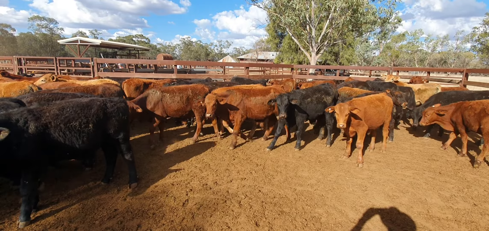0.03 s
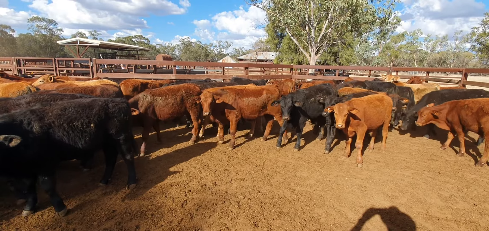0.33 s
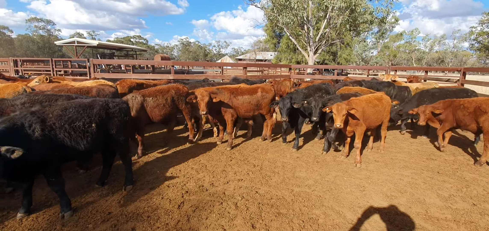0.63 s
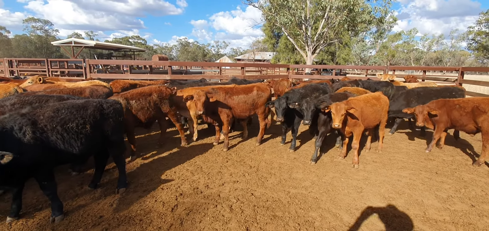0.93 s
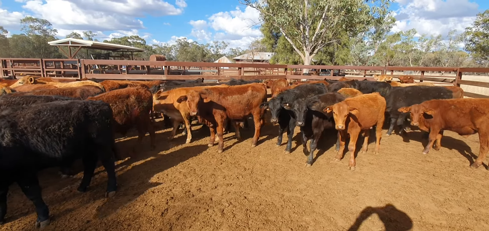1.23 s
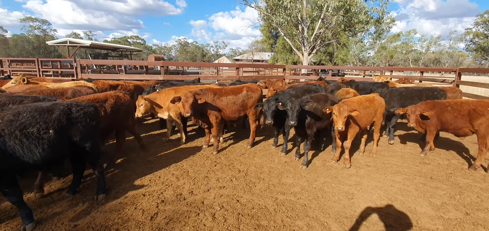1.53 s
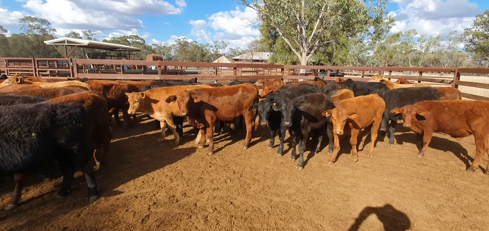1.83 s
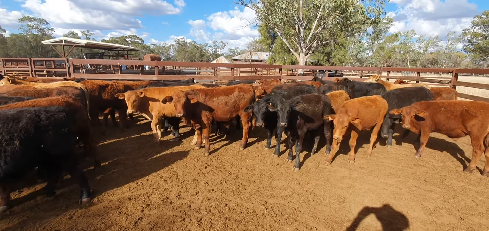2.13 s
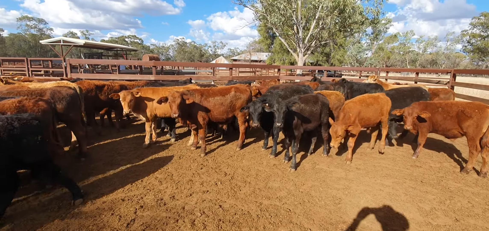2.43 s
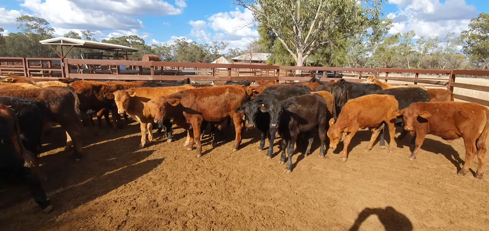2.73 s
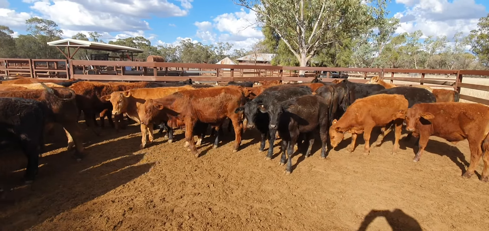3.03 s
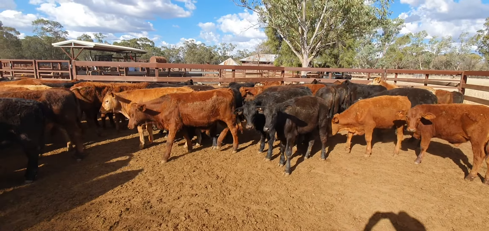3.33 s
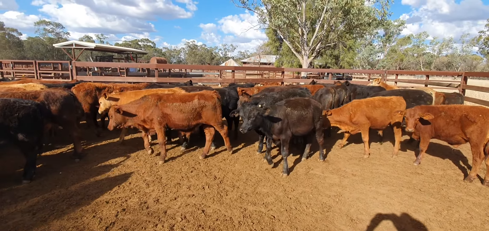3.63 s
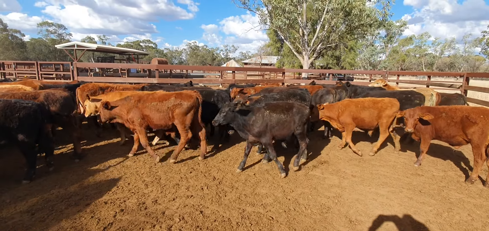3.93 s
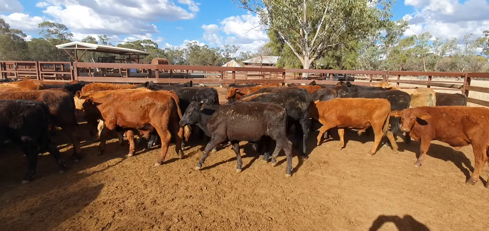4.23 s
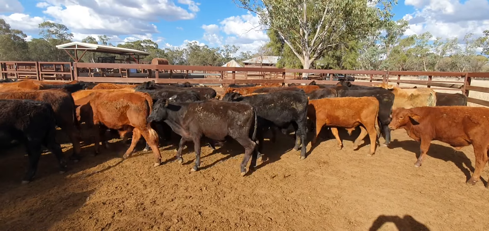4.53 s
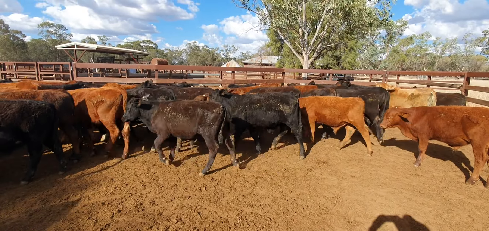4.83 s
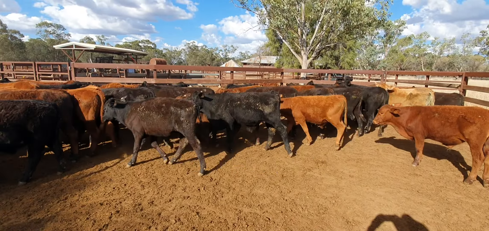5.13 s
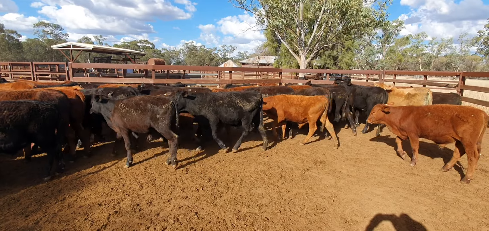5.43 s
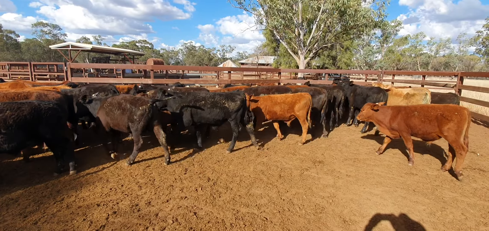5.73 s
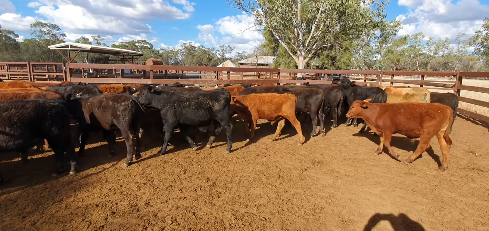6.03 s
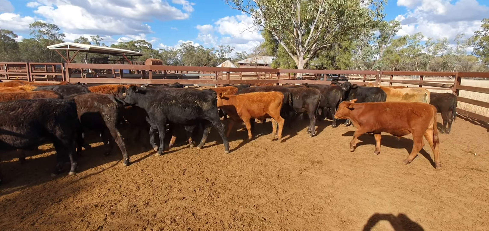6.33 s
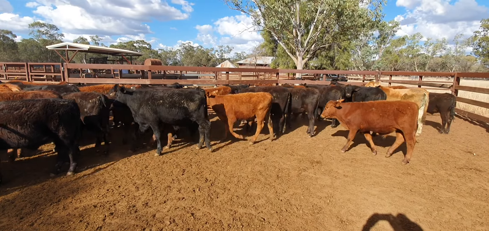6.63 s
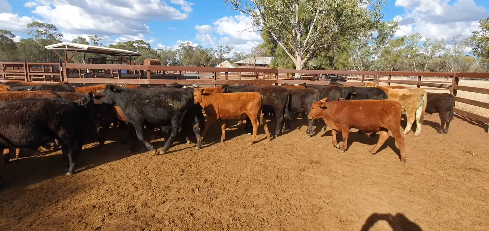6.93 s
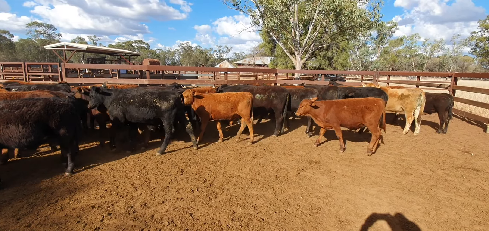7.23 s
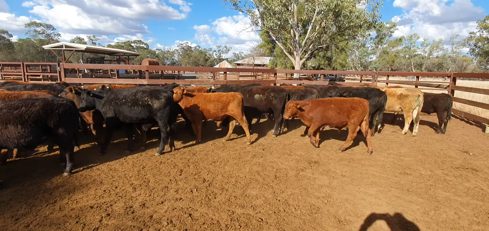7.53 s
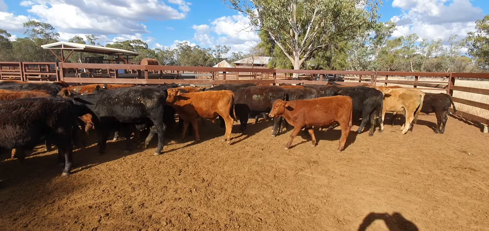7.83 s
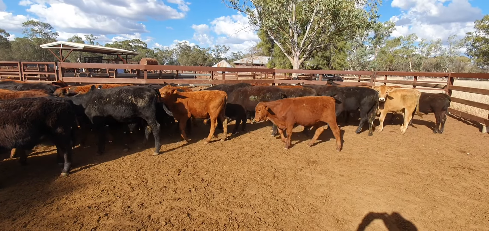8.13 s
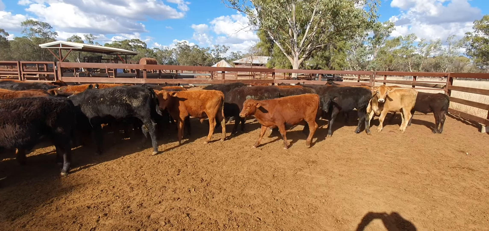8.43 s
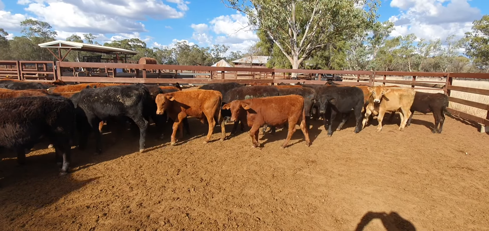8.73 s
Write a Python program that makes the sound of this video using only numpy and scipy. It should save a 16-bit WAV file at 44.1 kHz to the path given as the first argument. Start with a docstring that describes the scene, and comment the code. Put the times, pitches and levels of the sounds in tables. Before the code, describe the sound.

A herd shuffles quietly over dry ground in an open yard, with scattered dull hoof thuds, gritty scrapes and a light low rumble of air. The steps grow busier, then a gust of wind hits the microphone with deep, uneven thumps that dominate the hooves. A short metal clink and faint distant creaks and calls sit underneath. The gust falls away quickly and the soft footfalls carry on.

```python
"""An open stockyard, where young cattle mill about on dry dirt. Their crowded footfalls make a bed of
trample, rustle and dust, with faint creaks and calls far off. Nearer hooves thud on packed earth, crunch
its crust, scuff, flick pebbles and clack on stone; once a steel rail clinks. Over it all a gust builds,
rumbles and slaps at the two ports of the microphone, louder than the herd, and drops."""
import sys
import numpy as np
from scipy import signal
from scipy.fft import rfft, irfft, next_fast_len
from scipy.io import wavfile
from scipy.ndimage import uniform_filter1d

SR = 44100
rng = np.random.default_rng(int(sys.argv[2]) if len(sys.argv) > 2 else 0)


def output_pcm(signal):
    """Save a mono or channel-first signal as 16-bit PCM at the path in sys.argv[1].

    Samples are clipped to [-1, 1] before scaling.
    """
    pcm = np.clip(np.atleast_2d(signal).T, -1, 1) * 32767
    wavfile.write(sys.argv[1], SR, np.round(pcm).astype(np.int16))


N = 396459
TIME = np.arange(N) / SR


def amp(db):
    """Decibels to gain."""
    return 10 ** (np.asarray(db) / 20)


def unit(x):
    """Scales a sound to rms 1."""
    return x / np.sqrt(np.mean(x ** 2) + 1e-30)


def read(points, hz):
    """Reads a table of (f/Hz, value) on a log-frequency axis."""
    f, value = np.transpose(points)
    return np.interp(np.log(hz + 1), np.log(f + 1), value)


def curve(rows, column):
    """One column of a timed table as an automation curve, at every sample."""
    rows = np.asarray(rows)
    return np.interp(TIME, rows[:, 0], rows[:, column])


def add(mix, s, sound):
    """Mixes a stereo sound in at time s."""
    part = mix[:, max(0, round(s * SR)):][:, :sound.shape[1]]
    part += sound[:, :part.shape[1]]


def shaped(x, gain):
    """Filters a sound by a gain given as a function of Hz."""
    size = next_fast_len(x.shape[-1], True)
    return irfft(rfft(x, size) * gain(np.fft.rfftfreq(size, 1 / SR)), size)[..., :x.shape[-1]]


def eq(x, colour):
    """Equalises a sound by a table of (f/Hz, gain/dB)."""
    return shaped(x, lambda hz: amp(read(colour, hz)))


def bell_band(x, centre_hz, octaves):
    """Bell-shaped band-pass, returned at rms 1."""
    return unit(shaped(x, lambda hz: np.exp(-.5 * (np.log2((hz + 1) / centre_hz) / octaves) ** 2)))


def causal(x, gain):
    """Minimum-phase filter for hits: no sound comes before the attack."""
    size = 8192
    log_gain = np.log(gain(abs(np.fft.fftfreq(size, 1 / SR))) + 1e-9)
    response = np.exp(np.conj(signal.hilbert(log_gain)))[:size // 2 + 1]
    return irfft(rfft(x, size) * response, size)[..., :x.shape[-1]]


# stereo image of the yard: f/Hz, left-right correlation
PORT_LIKENESS = [(60, 1), (300, 0.75), (640, 0.55), (1400, -0.32), (3100, 0.18), (7000, -0.068)]
def paired(x):
    """Two unrelated sounds become a port pair: alike in the bass, wide in the treble."""
    alike = lambda hz: np.clip(read(PORT_LIKENESS, hz), -1, 1)
    right = shaped(x[0], alike) + shaped(x[1], lambda hz: np.sqrt(1 - alike(hz) ** 2))
    return np.array([x[0], right])


def drift(rate_hz):
    """Slow random modulation of rms 1, up to about the given rate."""
    return unit(shaped(rng.standard_normal(N), lambda hz: 1 / (1 + (hz / rate_hz) ** 4)))


def grains(size, per_s, spread_db):
    """Crumbs of dirt breaking: sparse stereo clicks of uneven size."""
    sizes = amp(spread_db * np.minimum(rng.exponential(1, size), 4))
    breaks = rng.random(size) < per_s / SR
    return sizes * breaks * rng.standard_normal((2, size))


# faint far creaks and calls: t/s, length/s, level/dB, f/Hz, width/Hz
CALL_CUES = [(4.139, 0.19, -61.5, 1270, 150), (6.521, 0.085, -57, 1220, 220),
             (8.132, 0.086, -74, 2590, 220), (8.367, 0.25, -64, 612, 140), (8.708, 0.092, -62, 2670, 420),
             (8.854, 0.077, -62, 2680, 420)]
def far_calls():
    """Distance blurs each call to a narrow, soft-edged band of noise."""
    out = np.zeros((2, N))
    for s, length_s, db, call_hz, width_hz in CALL_CUES:
        noise = paired(rng.standard_normal((2, int(length_s * SR))))
        tone = unit(shaped(noise, lambda hz: 1 / (1 + (2 * (hz - call_hz) / width_hz) ** 4)))
        add(out, s, amp(db) * tone * signal.windows.tukey(tone.shape[1], .5))
    return out


# hiss of the finest sand, raised by the nearest hooves: t/s, level/dB
SAND_RIDE = [(0, -82), (0.25, -85), (0.55, -82), (1.15, -90), (1.8, -92), (2.4, -81), (2.62, -75),
             (2.92, -73), (3.05, -83), (3.6, -83), (3.9, -77), (4.6, -78), (5.3, -77), (6.1, -77),
             (6.7, -78), (7.05, -75), (7.4, -83), (8.15, -92), (8.99, -85)]
# its airy colour: f/Hz, gain/dB
SAND_EQ = [(9000, -35), (11500, -4), (13500, -2), (15500, -2)]
def sand(trim_db=-1, sway_db=2.0):
    """Fine sand slides off the hooves in a soft, grainy swish."""
    slide = paired(rng.standard_normal((2, N)) + 0.4 * unit(grains(N, per_s=1500, spread_db=-3.0)))
    level_db = curve(SAND_RIDE, column=1) + trim_db + sway_db * drift(rate_hz=8.0)
    return amp(level_db) * unit(eq(slide, SAND_EQ))


def footfalls(per_s, fade_s):
    """Pressure of many unseen hooves: each lands at once and eases off."""
    lands = (rng.random(N) < per_s / SR) * rng.uniform(0.27, 1, N)
    return unit(signal.lfilter([1], [1, -np.exp(-1 / (fade_s * SR))], lands))


def patchy(x, depth_db=1.8):
    """Each shuffling hoof has its own colour: brief patches of the spectrum swell and sink."""
    spectra = signal.stft(x, nperseg=1024)[2]
    across_pitch = uniform_filter1d(rng.standard_normal(spectra.shape[1:]), size=4, axis=0)
    patches = unit(uniform_filter1d(across_pitch, size=11, axis=1))
    return signal.istft(spectra * amp(depth_db * patches), nperseg=1024)[1][:, :N]


def shuffle(colour, level_db, steps, step_share, crumb_share):
    """A wash of far shuffling with nearer crumbs crushed under each footfall."""
    wash = rng.standard_normal((2, N)) + crumb_share * unit(grains(N, per_s=900, spread_db=4.0))
    pressed = wash * np.sqrt(1 + (step_share * steps) ** 2)
    return amp(level_db) * unit(eq(patchy(paired(pressed)), colour))


# how busily the herd moves: t/s, rustle floor/dB, fizz floor/dB, trample floor/dB
HERD_RIDE = [(0.0, -63, -75.5, -67), (0.47, -63, -75, -63), (0.6, -64, -80, -66), (1.15, -63.5, -78.5, -68),
             (1.33, -60.5, -78, -61), (1.85, -64, -81, -65.5), (2.63, -62, -72, -62.5),
             (3.6, -63.5, -79.5, -66), (3.93, -59.5, -74, -56.5), (4.08, -61.5, -76, -63),
             (4.58, -62.5, -73.5, -59.5), (5.26, -61.5, -76.5, -62), (6.76, -60, -73.5, -55),
             (7.13, -62, -70, -62), (7.34, -65, -77, -65.5), (7.63, -66.5, -78, -68.5),
             (8.34, -67.5, -83, -69), (8.99, -61.5, -79, -60)]
# low body of the trample: f/Hz, gain/dB
TRAMPLE_EQ = [(60, -18), (130, 5), (250, 4.5), (400, -2), (700, -0.5), (950, -7), (1500, -14), (3000, -48)]
# dry midrange rustle of dirt: f/Hz, gain/dB
RUSTLE_EQ = [(600, -74), (1000, -4.5), (1350, 2), (1700, 1.5), (2150, 2.5), (2750, -3.5), (3600, 1),
             (4500, -1.5), (6000, -3.5), (7500, -11.5), (11000, -21.5)]
# top-end fizz of fine dust: f/Hz, gain/dB
FIZZ_EQ = [(4000, -24), (7000, 1.5), (9000, 2.5), (11300, 4), (13500, -12), (15500, -12)]
RUSTLE_LIFT_DB, FIZZ_LIFT_DB, TRAMPLE_LIFT_DB = 2.5, 0.5, 1.5  # each rides above its floor
def herd(trample_sway_db=1.83, rustle_sway_db=0.5, fizz_sway_db=1.1, sway_hz=6.8):
    """Trample, rustle and dust follow the same soft, crowded footfalls; each sways with the strides."""
    steps = footfalls(per_s=45, fade_s=.01)
    trample_db = curve(HERD_RIDE, column=3) + TRAMPLE_LIFT_DB + trample_sway_db * drift(sway_hz)
    rustle_db = curve(HERD_RIDE, column=1) + RUSTLE_LIFT_DB + rustle_sway_db * drift(sway_hz)
    fizz_db = curve(HERD_RIDE, column=2) + FIZZ_LIFT_DB + fizz_sway_db * drift(sway_hz)
    trample = shuffle(TRAMPLE_EQ, trample_db, steps, step_share=0.1, crumb_share=0.24)
    rustle = shuffle(RUSTLE_EQ, rustle_db, steps, step_share=0.36, crumb_share=0.17)
    fizz = shuffle(FIZZ_EQ, fizz_db, steps, step_share=0.1, crumb_share=0.36)
    return trample + rustle + fizz


def far_thuds(count=60, over_trample_db=6, spread_db=1.0, lowest_hz=110):
    """Dull thumps of hooves deep in the herd, each a cycle or two of ground ringing."""
    t, out = np.arange(SR // 12) / SR, np.zeros((2, N))
    trample_db = curve(HERD_RIDE, column=3) + TRAMPLE_LIFT_DB
    for when, pitch, size in rng.random((count, 3)):
        at = int(when * N)
        cycles = lowest_hz * 2.3 ** pitch * t
        thump = np.sin(2 * np.pi * cycles) * cycles / .5 * np.exp(1 - cycles / .5)
        gain = amp(trample_db[at] + over_trample_db + spread_db * size)
        add(out, at / SR, gain * np.array([thump, thump]))
    return out


# modes of the steel rail: f/Hz, level/dB, t60/s
RAIL_MODES = [(1962, -41, .11), (2040, -42, .07), (2130, -44, .04), (1385, -41, .04), (6051, -52, .05)]
def rail(at_s=6.2795):
    """A hoof catches a steel rail, which rings with a short clink."""
    t, out = np.arange(SR // 3) / SR, np.zeros((2, N))
    for hz, db, t60 in RAIL_MODES:
        ring = amp(db - 60 * t / t60) * np.sin(2 * np.pi * hz * t)
        add(out, at_s, np.array([ring, ring]))
    return out


# small stones flicked by a hoof, and the sharp click of a hoof striking the steel rail at 6.28 s: t/s,
# level/dB, centre f/Hz
PEBBLE_CUES = [(0.694, -46, 4270), (1.063, -42, 2150), (2.228, -44, 4970), (2.522, -56, 12000),
               (3.131, -52, 10000), (3.698, -58, 11000), (4.158, -61, 9000), (4.807, -50, 6500),
               (4.851, -57, 9000), (4.994, -59, 10000), (5.635, -55, 9000), (5.885, -50, 13000),
               (5.963, -51, 9000), (6.034, -46, 4940), (6.28, -37.5, 8100), (6.302, -49, 10000),
               (6.334, -55, 10000), (6.564, -57, 9000), (6.873, -54, 10000), (7.049, -59, 10000),
               (7.616, -61, 10000), (7.689, -53, 10000), (7.878, -51, 5500), (7.957, -58, 9000)]
def pebbles(fade_s=0.0014, octaves=0.45):
    """Each stone, and the hoof meeting the rail, gives one dry, bright tick."""
    t, out = np.arange(SR // 40) / SR, np.zeros((2, N))
    for s, db, centre_hz in PEBBLE_CUES:
        tick = bell_band(rng.standard_normal((2, len(t))), centre_hz, octaves)
        add(out, s, amp(db) * tick * np.exp(-t / fade_s))
    return out


# hooves hitting stone: t/s, level/dB
CLACK_CUES = [(0.5338, -48), (1.3085, -42), (1.319, -50), (4.035, -46), (7.878, -53)]
# modes of the hoof's hard horn: f/Hz, gain/dB, t60/s
HORN_MODES = [(2310, -6, 0.026), (3310, -6, 0.043), (3586, -3, 0.057), (3740, -5.5, 0.043),
              (4050, -17, 0.043), (4920, -12, 0.027)]
def clacks():
    """Horn meets stone: a short, dry, pitched crack."""
    t, out = np.arange(SR // 10) / SR, np.zeros((2, N))
    for s, level_db in CLACK_CUES:
        for hz, db, t60 in HORN_MODES:
            turns = hz * t + rng.random() + .25 * rng.random((2, 1))  # phase offsets add width
            add(out, s, amp(level_db + db - 60 * t / t60) * np.sin(2 * np.pi * turns))
    return out


# hooves dragged through loose dirt, and a faint creak at 6.29 s:
# t/s, length/s, level/dB, centre f/Hz, spread/octaves
SCUFF_CUES = [(0.03, 0.14, -61.5, 427, 0.56), (0.281, 0.13, -57, 500, 1.6), (0.54, 0.096, -55, 740, 1.3),
              (0.542, 0.12, -60, 2280, 1.2), (1.182, 0.12, -60, 446, 0.9), (1.308, 0.22, -52.5, 675, 0.63),
              (1.305, 0.0096, -38.5, 2400, 0.97), (1.306, 0.0086, -38, 14000, 0.48),
              (1.31, 0.05, -49.5, 2300, 0.74), (1.312, 0.05, -48, 400, 0.8),
              (1.455, 0.069, -51.5, 735, 1.14), (2.495, 0.067, -67, 12000, 0.54),
              (2.69, 0.085, -62, 596, 0.4), (3.312, 0.078, -52.5, 190, 0.62),
              (3.314, 0.083, -64.5, 11000, 1), (3.329, 0.057, -59, 700, 0.7),
              (3.505, 0.016, -51, 1550, 0.4), (3.532, 0.019, -52, 1390, 0.27),
              (3.747, 0.055, -57, 3960, 1.1), (3.683, 0.17, -52, 290, 0.53), (3.793, 0.12, -67, 1400, 1.3),
              (3.912, 0.043, -49, 1790, 0.93), (3.96, 0.034, -48, 1350, 0.4),
              (3.997, 0.058, -45.5, 1370, 1.0), (3.997, 0.06, -54, 630, 0.25),
              (4.023, 0.046, -45, 3500, 0.62), (4.28, 0.063, -53.5, 1200, 1.2),
              (4.68, 0.039, -53, 1000, 0.76), (5.45, 0.062, -55, 2800, 0.85),
              (5.551, 0.17, -54, 1740, 1.12), (5.643, 0.039, -55, 1500, 0.54),
              (5.831, 0.12, -55, 1860, 1.13), (5.851, 0.06, -50, 230, 0.46), (6.149, 0.063, -55, 3940, .6),
              (6.285, 0.054, -47.5, 2070, 0.82), (6.288, 0.066, -52, 614, 0.27),
              (6.525, 0.17, -53, 1700, 1), (6.791, 0.05, -55.5, 1570, 0.54), (6.247, 0.12, -52, 334, 0.36),
              (6.385, 0.024, -33, 315, 0.13), (7.24, 0.035, -48.5, 2680, 0.5),
              (7.233, 0.17, -55, 714, 0.54), (7.877, 0.094, -62, 3800, 0.95),
              (8.381, 0.089, -61, 277, 0.54), (8.711, 0.16, -55.5, 4530, 0.92),
              (8.739, 0.23, -53, 786, 0.72)]
def scuffs(rise_s=0.0032):
    """A drag is a quick swell of crunching grains that thins out; a narrow band of them is the creak."""
    out = np.zeros((2, N))
    for s, length_s, db, centre_hz, octaves in SCUFF_CUES:
        t = np.arange(int(2 * length_s * SR)) / SR
        dirt = bell_band(paired(grains(len(t), per_s=3500, spread_db=2.8)), centre_hz, octaves)
        swell = (1 - np.exp(-t / rise_s)) * np.exp(-t / length_s - 2 * (t / length_s) ** 4)
        add(out, s, amp(db) * dirt * swell)
    return out


HIT_WINDOW_S = .025  # a hit's level is its energy spread over this time
def thud(db, hz, rise_cycles=0.53, fade_cycles=1.54, overtone_db=-11.5):
    """Packed earth gives under a hoof and swings for a few rounded cycles."""
    cycles = hz * np.arange(SR // 8) / SR
    overtone = amp(overtone_db) * np.sin(2 * np.pi * (2 * cycles + rng.random()))
    envelope = (1 - np.exp(-(cycles / rise_cycles) ** 2)) * np.exp(-cycles / fade_cycles)
    swing = (np.sin(2 * np.pi * cycles) + overtone) * envelope
    swing /= np.sqrt(np.sum(swing ** 2) / (HIT_WINDOW_S * SR))
    return amp(db) * np.array([swing, swing])


# EQ bands of a hoof strike: low f/Hz, high f/Hz
STRIKE_BANDS = [(85, 180), (180, 390), (390, 900), (1000, 2700), (2800, 6800), (7000, 15000)]
def strike(t60, band_db):
    """A blow, then crumbling dirt and a faint tail from the yard."""
    t = np.arange(SR // 8) / SR
    rise = 1 - np.exp(-t / .0008)
    fall = amp(-60 * t / t60) + amp(-25 - 60 * t / .2)  # the hit, then the tail
    crumble = paired(grains(len(t), per_s=6600, spread_db=2.2)) * rise * fall
    crumble /= np.sqrt(np.sum(crumble ** 2) / 2)
    # the weight of the animal drives the bass, the breaking crust the treble
    weight = lambda hz: .85 / np.hypot(1, hz / 800)
    stamp = causal(signal.unit_impulse(len(t), idx=70), weight)
    crust = causal(crumble, lambda hz: np.sqrt(1 - weight(hz) ** 2))
    low, high = np.transpose(STRIKE_BANDS)
    per_hz_db = band_db + 10 * np.log10(HIT_WINDOW_S * SR * SR / 2 / (high - low))
    colour = np.transpose([np.sqrt(low * high), per_hz_db])
    low_cut = lambda hz: (hz + 10) ** 2 / np.hypot((hz + 10) ** 2, low[0] ** 2)
    return causal(stamp + crust, lambda hz: amp(read(colour, hz)) * low_cut(hz))


# near hooves on crusted ground, and one thump of tearing wind at 6.84 s:
# t/s, thud level/dB, thud f/Hz, crunch level/dB, crunch f/Hz
HIT_CUES = [(0.089, -61, 300, -76, 2500), (0.235, -60.5, 327, -77, 2500), (0.317, -58.5, 342, -70, 1500),
            (0.532, -60, 415, -45, 3500), (0.89, -53.5, 182, -72, 3000), (1.062, -82, 500, -66, 1900),
            (1.307, -45, 342, -49.5, 4280), (1.853, -60, 200, -57, 3420), (2.226, -56.5, 394, -55.5, 4760),
            (2.421, -51, 197, -59.5, 1700), (2.445, -54, 300, -60, 1500), (2.538, -50, 181, -63, 4000),
            (2.683, -47.5, 267, -69, 2900), (2.684, -50.5, 560, -77, 1300), (2.719, -50, 180, -74, 2000),
            (3.045, -58, 367, -69, 3000), (3.131, -85, 600, -55, 6070), (3.272, -49, 156, -74, 2500),
            (3.378, -50, 161, -72, 2500), (3.498, -50.5, 195, -66, 1860), (3.717, -45.5, 215, -63, 2600),
            (3.738, -54, 187, -53.5, 2100), (3.816, -50, 203, -62, 2000), (3.921, -66, 500, -57, 1800),
            (3.994, -61, 300, -54, 1500), (4.002, -58, 665, -53, 1400), (4.261, -62, 620, -55.5, 2500),
            (4.329, -41.5, 144, -49, 1660), (4.361, -39, 203, -65, 2500), (4.363, -54, 556, -74, 1500),
            (4.465, -57, 300, -68, 1700), (4.711, -43, 674, -50.5, 1400), (4.712, -47.5, 260, -66, 1800),
            (4.718, -46, 820, -54.5, 1600), (4.807, -61, 656, -62.5, 5500), (4.903, -58, 660, -56, 1300),
            (5.177, -61, 420, -56, 1700), (5.367, -70, 500, -59, 1700), (5.509, -48, 275, -61, 2500),
            (5.882, -52, 277, -60, 1600), (6.021, -60, 776, -58.5, 2200), (6.035, -54.5, 770, -55, 2200),
            (6.279, -64, 340, -45, 3370), (6.386, -43.5, 302, -71, 2600), (6.517, -77, 500, -57, 4200),
            (6.665, -51, 600, -53, 1400), (6.788, -44.5, 320, -58, 1400), (6.836, -44, 364, -74, 2000),
            (6.886, -52.5, 584, -80, 3500), (7.128, -50.5, 190, -59.5, 4800), (7.236, -59, 380, -56, 1990),
            (7.436, -66, 596, -78, 4000), (7.688, -77, 654, -59.5, 2750), (7.865, -52, 273, -61.5, 2100),
            (7.939, -54, 190, -77, 3000), (8.979, -46.5, 590, -69, 2400)]
THUD_DB_PER_OCTAVE, CRUNCH_DB_PER_OCTAVE = 14, 7  # roll-off on both sides of each pitch
HARD_CRUNCH_DB, DULL_ABOVE_HZ, DULLING = -52.5, 4500, 0.5  # dB/octave of treble lost per dB softer
USUAL_T60_S, USUAL_HIT_DB, SHORTEN_PER_DB = 0.058, -66, 0.015
def near_hits(slap_trim_db=-1.5, ring_trim_db=-5):
    """Hooves and one wind thump, each a slap, a crunch and a low ring; soft hits are duller, longer."""
    out, band_hz = np.zeros((2, N)), np.sqrt(np.prod(STRIKE_BANDS, axis=1))
    for s, thud_db, thud_hz, crunch_db, crunch_hz in HIT_CUES:
        slap = thud_db + slap_trim_db - THUD_DB_PER_OCTAVE * abs(np.log2(band_hz / thud_hz))
        crunch = crunch_db - CRUNCH_DB_PER_OCTAVE * abs(np.log2(band_hz / crunch_hz))
        treble_octaves = np.maximum(np.log2(band_hz / max(crunch_hz, DULL_ABOVE_HZ)), 0)
        crunch -= DULLING * max(HARD_CRUNCH_DB - crunch_db, 0) * treble_octaves
        t60 = USUAL_T60_S * np.exp(-SHORTEN_PER_DB * (max(thud_db, crunch_db) - USUAL_HIT_DB))
        add(out, s - .001, strike(t60, band_db=np.maximum(slap, crunch)))
        add(out, s, thud(thud_db + ring_trim_db, thud_hz))
    return out


# colour of the ground bounce: f/Hz, gain/dB
GROUND_EQ = [(100, -2), (450, -1), (620, 1.5), (820, 2.5), (1000, -2.5), (1330, 3), (1650, 1), (2200, 2),
             (2900, -2), (3650, 2.5), (4600, 0), (9000, 1)]
def ground_bounce(near):
    """Near sounds arrive directly and off the ground, which ripples their spectrum."""
    bounce = causal(signal.unit_impulse(SR // 20), lambda hz: amp(read(GROUND_EQ, hz)))
    return signal.oaconvolve(near, bounce[None], axes=1)[:, :N]


# light air builds to one gust, drops, and puffs once more: t/s, strength/dB, left minus right/dB
WIND_RIDE = [(0, -61.5, -1), (1.5, -60.5, 2), (1.72, -67, 2), (2.05, -60.5, 1), (2.45, -59, 3),
             (2.8, -68.5, -1), (3.65, -56, 4), (4.45, -60, 4), (4.7, -50, -10), (5.25, -50.5, -1),
             (5.53, -37, 6.5), (5.71, -43, -2), (5.83, -35, -4), (6.02, -53.5, 11), (6.13, -34.5, 7),
             (6.36, -34, 0.5), (6.6, -30, 3), (6.83, -21.5, -3), (6.92, -30, 0), (7.02, -36, 9),
             (7.13, -40.5, 15), (7.25, -41.5, 27), (7.29, -60, -29), (7.42, -67, 24), (7.75, -68, -2),
             (8.3, -67, -5), (8.64, -64, -24), (8.8, -55.5, -23), (8.99, -63.5, -27)]
# bass-heavy colour of wind on the ports: f/Hz, gain/dB
RUMBLE_EQ = [(15, -2), (30, 0), (50, 6), (90, 4), (125, -6), (200, -14), (300, -35), (500, -55),
             (1000, -96), (2500, -105)]
def wind(trim_db=2.0, puff_hz=7.8, puff_db=0.6):
    """Light air rumbles in lumps, alike at both ports; a gust gives each its own steadier turbulence."""
    shared, *own = eq(rng.standard_normal((3, N)), RUMBLE_EQ)
    lumps, ports = drift(rate_hz=11.8), []
    port_db = curve(WIND_RIDE, column=1) + np.outer([.5, -.5], curve(WIND_RIDE, column=2))
    for strength_db, eddies in zip(port_db, own):
        apart = np.interp(strength_db, [-56, -42], [.35, 1])
        lumps_db = lumps * np.interp(strength_db, [-54, -38], [4.2, 2.2])
        flow = unit(np.sqrt(1 - apart) * shared + np.sqrt(apart) * eddies)
        flow /= np.sqrt(uniform_filter1d(flow ** 2, size=5000) + 0.03)  # evens out the noise's swells
        puffs_db = puff_db * drift(puff_hz)  # each port drifts in and out of the flow
        ports.append(flow * amp(strength_db + trim_db + lumps_db + puffs_db))
    return np.array(ports)


# single eddies that slap the ports: t/s, left level/dB, right level/dB, f/Hz
BUFFET_CUES = [(0.321, -49, -49, 102), (0.856, -46, -42, 69), (1.131, -45, -49, 77), (1.427, -30, -50, 76),
               (1.543, -45, -43, 108), (2.183, -47, -62, 102), (2.307, -46, -49, 94), (2.563, -43, -44, 79),
               (3.642, -38, -51, 79), (4.011, -38.5, -43, 70), (4.247, -43, -44, 60),
               (4.598, -31.5, -48, 62), (4.765, -45, -41, 71), (4.849, -47, -29.5, 73),
               (5.122, -34, -31, 57), (5.204, -33, -33, 92.5), (5.425, -23, -37, 72.5),
               (5.559, -21.5, -47, 75), (5.643, -37, -23.5, 102), (5.739, -33, -28, 71),
               (5.801, -14.5, -25, 60.7), (6.133, -11, -14.5, 79), (6.183, -17, -29, 70.4),
               (6.211, -22, -35, 82.4), (6.303, -25.5, -25.5, 91), (6.46, -33, -16.5, 142),
               (6.496, -24, -16.5, 70), (6.541, -13.5, -22, 77), (6.67, -9, -19, 80), (6.709, -24, -17, 84),
               (6.772, -8, -28, 62), (6.808, -39, -11, 100), (6.84, -38, -3.5, 97.4),
               (6.962, -11, -19.5, 93), (7.035, -16, -27, 58), (7.078, -16.5, -40, 82.5),
               (7.196, -7.5, -51, 82), (7.253, -8, -44, 81), (7.344, -61, -27, 76.6),
               (7.47, -36.5, -54, 81), (7.569, -33.5, -46, 63.7), (7.601, -55, -37.5, 69.4),
               (8.159, -51, -54, 72), (8.421, -44, -46, 78.5), (8.535, -39, -44, 68.6),
               (8.703, -61, -35, 85.5), (8.754, -32, -32, 74), (8.799, -37, -45, 85.5),
               (8.942, -60, -38, 75)]
# colour of the tearing air: f/Hz, gain/dB
TEAR_EQ = [(100, -21), (200, 14.5), (330, -2.5), (520, -18.5), (750, -33), (1500, -72)]
TEAR_DB, HARDEST_BUFFET_DB, TEAR_DB_PER_DB = -17, -3.5, 0.69  # tear against swing; less in softer ones
def buffets(width_cycles=0.52, edge=0.31, trim_db=-2, tear_s=0.012):
    """An eddy swings the pressure for a cycle or two and tears at its height, more so when hard."""
    t, out = np.arange(-SR // 16, SR // 16) / SR, np.zeros((2, N))
    for s, left_db, right_db, hz in BUFFET_CUES:
        phase = 2 * np.pi * (hz * t + rng.random() + rng.random((2, 1)) * 0.38)  # ports a little apart
        swell = np.exp(-.5 * (hz * t / width_cycles) ** 2)
        swing = swell * np.sin(phase) + edge * swell ** 2 * np.sin(2 * phase)
        tear = unit(eq(rng.standard_normal((2, len(t))), TEAR_EQ))
        torn_db = TEAR_DB + TEAR_DB_PER_DB * (max(left_db, right_db) - HARDEST_BUFFET_DB)
        swing += amp(torn_db) * tear * np.exp(-.5 * (t / tear_s) ** 2)
        add(out, s + t[0], amp([[left_db], [right_db]]) * amp(trim_db) * swing)
    return out


# balance of the yard between the ports: f/Hz, left minus right/dB
PORT_BALANCE = [(60, -0.5), (400, 0.3), (1300, 1.5), (2400, 3), (4400, 0.5), (7000, -2.5), (9000, 7),
                (11500, 9.5), (15500, 10)]
def scene():
    """The yard, heard brighter by the left port, and the wind on both ports."""
    near = ground_bounce(near_hits() + scuffs())
    yard = herd() + sand() + pebbles() + far_thuds() + near + clacks() + rail() + far_calls()
    yard = shaped(yard, lambda hz: amp(np.outer([.5, -.5], read(PORT_BALANCE, hz))))
    return yard + wind() + buffets()


def record(dry):
    """The microphone rounds off the hardest buffets; then a low cut and a steep high cut."""
    ceiling, low_cut_hz, high_cut_hz = .5, 33, 15900
    rounded = ceiling * np.tanh(dry / ceiling)
    cut = shaped(rounded, lambda hz: hz ** 3 / np.hypot(hz ** 3, low_cut_hz ** 3))
    high_cut = signal.firwin(511, high_cut_hz, window=("kaiser", 9), fs=SR)
    return signal.oaconvolve(cut, high_cut[None], "same", axes=1)


dry = scene()
out = record(dry)
output_pcm(out)
```